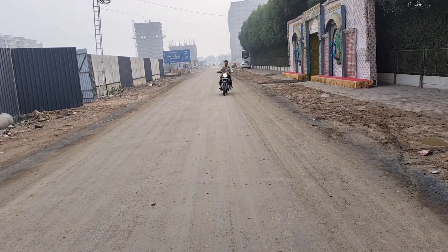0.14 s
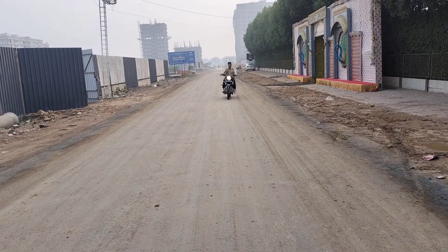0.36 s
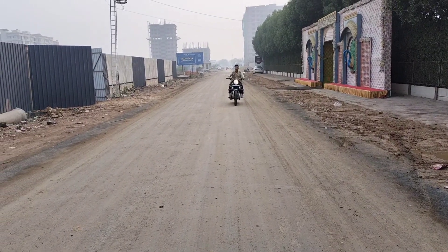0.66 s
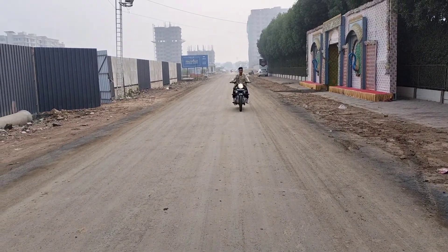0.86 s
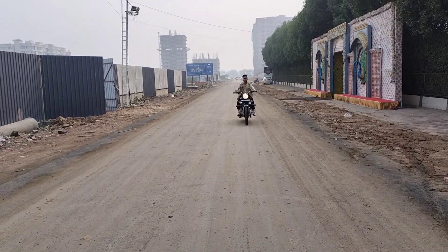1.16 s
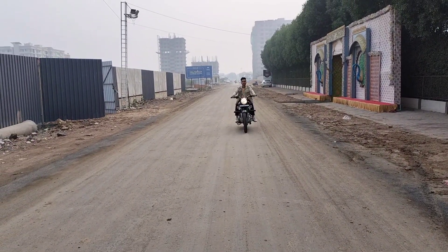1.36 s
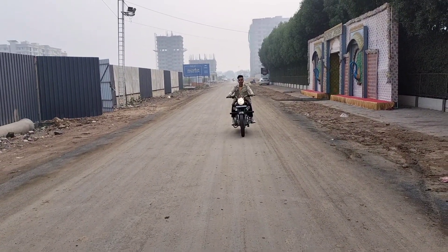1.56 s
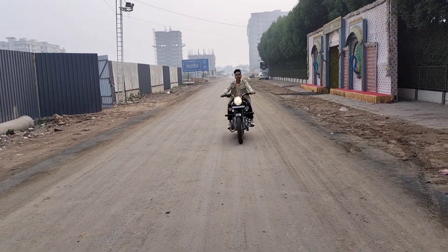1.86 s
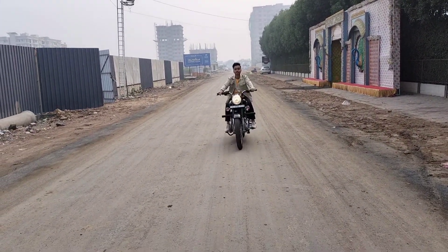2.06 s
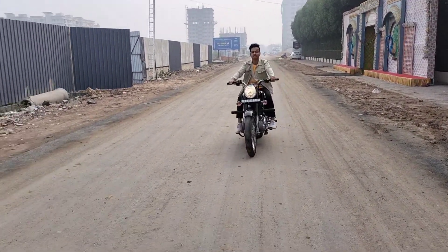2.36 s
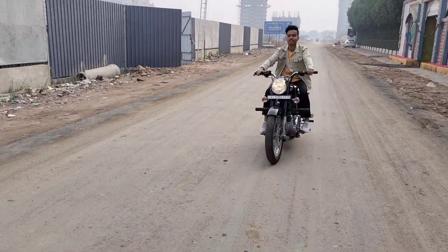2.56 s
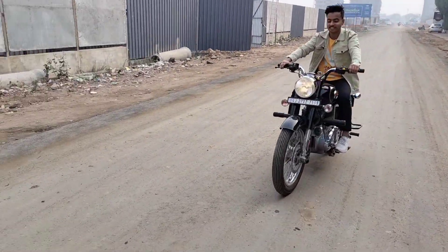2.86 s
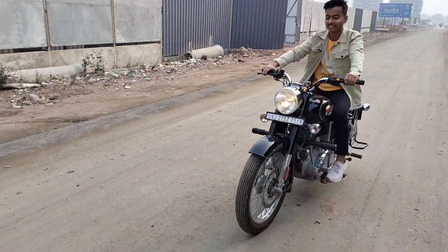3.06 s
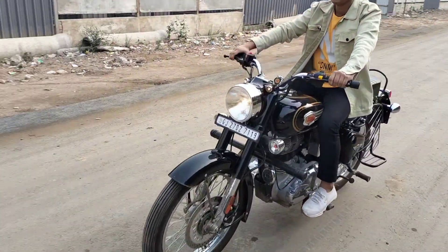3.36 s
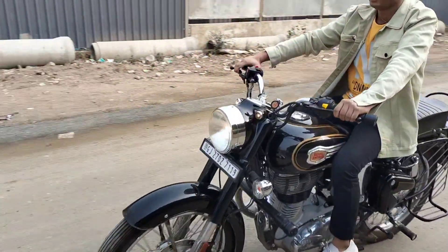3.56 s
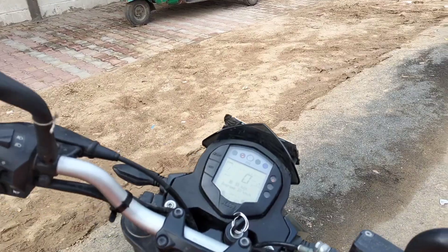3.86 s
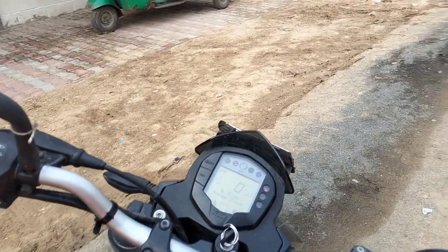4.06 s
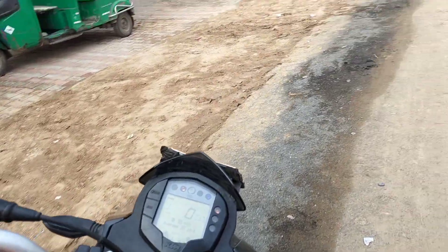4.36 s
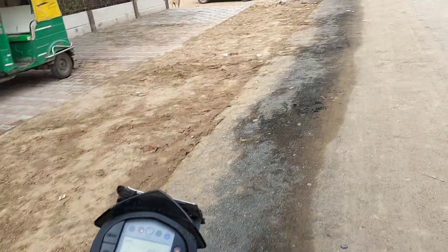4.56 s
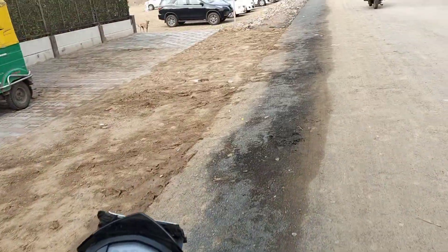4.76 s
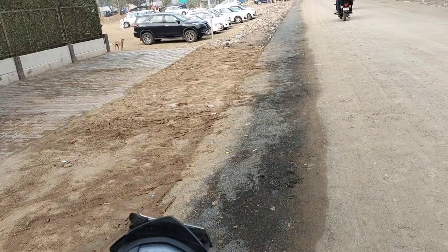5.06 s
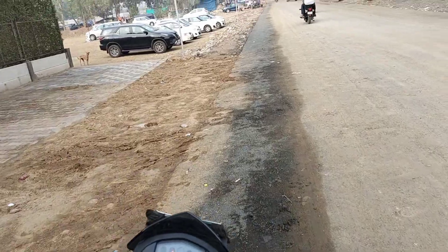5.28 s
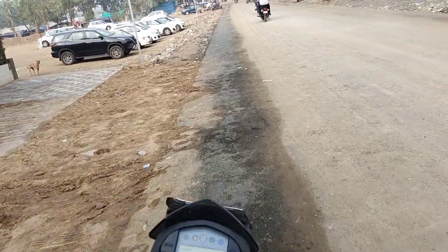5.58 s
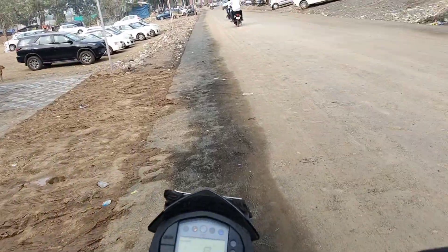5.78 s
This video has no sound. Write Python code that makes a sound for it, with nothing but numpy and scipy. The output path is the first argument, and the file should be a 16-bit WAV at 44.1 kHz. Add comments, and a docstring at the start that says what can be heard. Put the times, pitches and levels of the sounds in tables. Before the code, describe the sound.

Deep motorcycle exhaust roars up a roadside, eases into slow thuds, a brief silent gap, then a raspier small engine accelerates from the saddle.

```python
"""Two single-cylinder motorcycles on a dusty road

From the roadside, a big single rides up: it pulls, coasts for a gear change, pulls again, then slows until every
firing is a separate thump. After a short silence a smaller single pulls away, heard from the saddle, and changes
up once. Pulses timed by the engine cycle ring pipes and mufflers, timed noise bursts make rasp, clatter and valve
ticks, and the running gear clicks and squeaks. Fences and walls answer with decaying noise; filtered noise makes
the road bed behind the first machine and the wind around the second.
"""
import sys
import numpy as np
from scipy import signal
from scipy.fft import rfft, irfft, next_fast_len
from scipy.io import wavfile
from scipy.ndimage import uniform_filter1d, map_coordinates

SR = 44100
rng = np.random.default_rng(int(sys.argv[2]) if len(sys.argv) > 2 else 0)


def wav_record(signal):
    """Record a signal, one row per channel, as 16-bit PCM in the file named by sys.argv[1]."""
    frames = np.transpose(np.atleast_2d(signal))
    bounded = np.clip(frames, -1, 1)
    # unit amplitude maps onto the largest positive 16-bit level
    quanta = np.round(bounded * 32767).astype(np.int16)
    wavfile.write(sys.argv[1], SR, quanta)


N = 261072
TIME = np.arange(N) / SR
SMEAR_S = 0.04  # longest delay of a note in the big exhaust at speed, so the firings run together

# rasp of the small engine in first gear, also the tone of its valve ticks: (frequency [Hz], level [dB])
LAUNCH_RASP = [(650, -11), (1100, -6), (1460, -1.5), (1740, -1.5), (2110, -6), (2490, -1), (3080, -9),
               (3650, -6), (4880, -13.5), (5970, -12), (7810, -20.5), (12900, -23.5), (16000, -28)]


def amp(db):
    """Decibels to gain."""
    return 10 ** (np.asarray(db) / 20)


def unit(x):
    """x at rms 1."""
    return x / np.sqrt(np.mean(x ** 2) + 1e-20)


def along(points, hz):
    """Values at hz from (frequency [Hz], value) points on a log frequency axis."""
    f, v = np.transpose(points)
    return np.interp(np.log(hz + 1), np.log(f + 1), v)


def curve(rows):
    """One value per sample from (time [s], value) rows."""
    times, values = np.transpose(rows)
    return np.interp(TIME, times, values)


def filtered(x, response):
    """x times a complex response of frequency."""
    n = x.shape[-1]
    m = next_fast_len(n + SR // 2, real=True)
    return irfft(rfft(x, m) * response(np.fft.rfftfreq(m, 1 / SR)), m)[..., :n]


def coloured(x, spectrum):
    """x through a (frequency [Hz], level [dB]) spectrum."""
    return filtered(x, lambda hz: amp(along(spectrum, hz)))


def ring(x, modes):
    """x through resonances (frequency [Hz], width [Hz], level [dB]); the packing absorbs the treble."""
    def body(f):
        total = 0
        for k, (centre, width, db) in enumerate(modes):
            resonance = 1j * f * width / (centre * centre - f * f + 1j * f * width)
            total = total + (-1) ** k * amp(db) * resonance  # neighbours have opposite signs
        return total / (1 + (f / 2000) ** 2)
    return filtered(x, body)


def crank(speed):
    """Engine cycles turned since the first firing, which falls on the first row, and the firing rate [Hz]."""
    rate = curve(speed)
    first_s, first_rate = speed[0]
    return np.cumsum(rate) / SR - first_s * first_rate, rate


def steady(x, cycles):
    """x with the same power in every part of the run, judged over a few engine cycles."""
    index = (np.floor(cycles) - np.floor(cycles[0])).astype(int)
    power = np.bincount(index, np.mean(np.atleast_2d(x) ** 2, axis=0)) / np.bincount(index)
    return x / np.sqrt(np.abs(uniform_filter1d(power, size=3))[index] + 1e-20)


def firings(cycles, scatter_db):
    """One pressure pulse per cycle, each of its own size."""
    pulses = np.diff(np.floor(cycles), prepend=np.floor(cycles[0]) - 1)
    return unit(pulses * amp(scatter_db * rng.standard_normal(N)))


def puffs(cycles, rate, beats, bed, alike=0):
    """Stereo noise bursting at beats (cycle share, life [s], level [dB]) over a steady bed.

    The share alike of its power repeats the same noise in every cycle.
    """
    gate = bed
    for at, life, db in beats:
        since = ((cycles - at) % 1) / rate  # seconds since this beat
        gate = gate + amp(db) * np.exp(-since / life)
    age = np.arange(N) - np.searchsorted(cycles, np.floor(cycles))  # samples since the cycle began
    fresh = rng.standard_normal((2, N))
    repeated = fresh[:, -1 - age]
    return unit(gate * (np.sqrt(1 - alike) * fresh + np.sqrt(alike) * repeated))


def flicker(rate, depth_db):
    """A random gain that moves rate times a second."""
    knots = rng.standard_normal(int(N * rate / SR) + 4)
    return amp(depth_db * map_coordinates(knots, [np.arange(N) * rate / SR], order=1))


def narrowed(pair, width):
    """A stereo pair with its side part scaled."""
    mid, side = pair[0] + pair[1], width * (pair[0] - pair[1])
    return np.array([mid + side, mid - side]) / np.sqrt(2 + 2 * width ** 2)


def pipe(x, trip, reflection):
    """The pressure front comes back after every round trip [s] of the pipe."""
    return filtered(x, lambda hz: 1 / (1 - reflection * np.exp(-2j * np.pi * hz * trip)))


def swell(throttle, shut_db, open_db, exponent):
    """Gain of a layer that grows from its shut-throttle to its open-throttle level."""
    return amp(shut_db) + (amp(open_db) - amp(shut_db)) * throttle ** exponent


def retuned(x, tuning, body):
    """x through a body whose resonances all slide by the pitch factor tuning."""
    clock = np.cumsum(tuning)
    even = np.arange(int(clock[-1]) + 1)
    answer = body(np.array([np.interp(even, clock, row) for row in np.atleast_2d(x)]))
    return np.array([np.interp(clock, even, row) for row in answer])


def smeared(x, longest_s):
    """Many paths through a pipe: every note leaves after its own delay, at full strength."""
    knots = np.arange(0, 2000, 25)  # Hz
    delays = longest_s * rng.random(len(knots))
    return filtered(x, lambda hz: np.exp(-2j * np.pi * np.cumsum(np.interp(hz, knots, delays)) * hz[1]))


def ports(x, lead_s):
    """A sound from one side reaches the left microphone port lead_s before the right."""
    return filtered(x, lambda hz: np.exp(1j * np.pi * hz * lead_s * np.array([[1], [-1]])))


def big_single():
    """Each firing rings the long pipe and the muffler; the throttle decides which resonances speak."""
    # engine speed: (time [s], firing rate [Hz])
    big_speed = [(-0.011, 20.52), (0.8, 23.59), (1.2, 20.04), (1.32, 15.38), (1.49, 16.38), (2.26, 17.02),
                 (2.5, 15.97), (2.75, 13.45), (2.95, 12.17)]
    # throttle opening: (time [s], opening [0-1])
    big_throttle = [(0.22, 0.65), (0.5, 0.93), (0.84, 0.94), (0.92, 0.08), (1.02, 0.08), (1.19, 0.11),
                    (1.225, 0.3), (1.8, 0.62), (2.31, 0.55), (2.42, 0.12), (2.6, 0.05)]
    # muffler pitch as its gas heats and cools: (time [s], pitch factor)
    big_tuning = [(0.1, 1.01), (0.45, 1.026), (0.8, 0.98), (1.25, 0.97), (1.7, 1), (2.3, 1.02),
                  (2.55, 0.85)]
    # muffler resonances at speed: (frequency [Hz], width [Hz], level [dB])
    fast_muffler = [(464, 29, -15), (623.3, 21, 2.5), (680, 43, -11.5), (740, 19, -0.5), (898, 25.4, -2.5),
                    (937, 34, -9)]
    # muffler on part throttle, where the gas is cooler: (frequency [Hz], width [Hz], level [dB])
    part_muffler = [(471, 16, -10), (600.4, 20.3, 2.5), (717, 56, -7), (908, 17.2, -2), (1227, 16, -10)]
    # level of the pipe's boom: (time [s], level [dB])
    boom_level = [(0.85, 2.5), (0.95, 2.5), (1.1, 5.5), (1.19, 1), (1.35, 1.5), (2.3, 3.5), (2.5, 6),
                  (2.9, 5.5)]
    # rasp under load: (frequency [Hz], level [dB])
    big_rasp = [(590, -15.5), (1000, -17), (1120, -9.5), (1250, 3), (1480, -5.5), (1980, 3.5), (2200, -4),
                (2560, 0), (2910, -11.5), (3670, -9.5), (4790, -20.5), (5630, -17), (7880, -34),
                (13300, -32.5), (16000, -38)]
    # clatter off load: (frequency [Hz], level [dB])
    big_clatter = [(530, -35.5), (860, 1), (979, 0), (1100, -9.5), (1620, -5), (1750, -7), (2420, -1),
                   (3000, -8.5), (3770, -9.5), (5350, -18.5), (7860, -26.5), (15100, -31), (16000, -43)]
    # ticks of the valves: (frequency [Hz], level [dB])
    big_valves = [(1500, -24), (3000, -2), (3800, 4.5), (5600, -1.5), (7500, -13.5), (9000, -22),
                  (16000, -24)]
    thumps_from_s = 2.981  # the running exhaust gives way to the separate thumps here

    cycles, rate = crank(big_speed)
    throttle = curve(big_throttle)
    load = np.clip(throttle * 2, 0, 1)
    flat_out = np.clip((throttle - .6) / .4, 0, 1)
    pulse = firings(cycles - .06, scatter_db=1.8)
    gas = puffs(cycles, rate, [(0.017, 0.042, 0.0063)], bed=1.0)
    rush = .38 * narrowed(gas, width=.4)

    # the muffler barks: hot and smeared at speed, cooler and more distinct on part throttle
    hot = np.clip((rate - 20) / .5, 0, 1) * np.clip((1.15 - TIME) / .2, 0, 1)
    full = retuned(smeared(pulse, SMEAR_S) + rush, big_tuning_curve := curve(big_tuning),
                   lambda x: ring(x, fast_muffler))
    distinct = unit(pipe(pulse, trip=.0075, reflection=-.45))
    lingering = .9 * smeared(pulse, SMEAR_S)  # rings on from beat to beat
    part = retuned(distinct + lingering + rush, big_tuning_curve, lambda x: ring(x, part_muffler))
    bark = ports(steady(hot * full + (1 - hot) * part, cycles), lead_s=0.00012)

    boom = amp(curve(boom_level)) * big_boom(cycles, rate, gas, load, flat_out)
    boom = swell(throttle, shut_db=-22.5, open_db=-17, exponent=1.5) * boom
    bark = swell(throttle, shut_db=-47.5, open_db=-18, exponent=1.0) * bark
    rolling = np.clip((thumps_from_s + .01 - TIME) / .02, 0, 1)
    exhaust = rolling * (boom + bark)

    rasp_beats = [(0, .008, -9), (.17, .005, -2), (.4, .006, -9), (.65, .008, -9)]
    rasp = flicker(300, depth_db=2.5) * puffs(cycles, rate, rasp_beats, bed=.42, alike=.65)
    rasp = steady(coloured(narrowed(rasp, width=0.98), big_rasp), cycles)
    clatter_beats = [(.05, 0.0019, -5), (.55, 0.0017, -2.5)]
    clatter = flicker(250, depth_db=2.5) * puffs(cycles, rate, clatter_beats, bed=1.0)
    clatter = steady(coloured(narrowed(clatter, width=1.0), big_clatter), cycles)
    clatter = clatter * amp(4 * np.clip(TIME - thumps_from_s, 0, 1))  # grows 4 dB/s over the last metres
    hiss = np.sqrt(load) * rasp + np.sqrt(1 - load) * clatter
    hiss = swell(throttle, shut_db=-37, open_db=-21, exponent=3.97) * hiss

    valves = unit(coloured(puffs(cycles, rate, [(.905, .002, 0), (.41, .0015, -3)], bed=0), big_valves))
    return exhaust + hiss + amp(-45) * load * valves


def big_boom(cycles, rate, gas, load, flat_out):
    """The long pipe: sharp beats at low speed, a continuous roar at high speed, a sinking throb when coasting."""
    # beat of the pipe on part throttle: (frequency [Hz], level [dB])
    beat_tone = [(25, -26.5), (45, -15), (70, 4.5), (130, 1), (175, -12), (230, 3), (305, -5), (360, -19.5),
                 (480, -23.5), (800, -61)]
    # what the pipe rings with after each beat: (frequency [Hz], width [Hz], level [dB])
    pipe_ring = [(134, 14, 0), (227, 30, -7.5), (309, 9.4, -4)]
    # roar of the pipe at speed: (frequency [Hz], level [dB])
    roar_tone = [(45, -16), (68, -5), (90, -0.5), (135, -3), (170, -9), (215, -5.5), (250, -6), (300, -1),
                 (345, -15.5), (480, -26), (800, -62.5)]
    # soft throb with the throttle shut: (frequency [Hz], level [dB])
    coasting_tone = [(25, -31), (45, -3), (65, 8), (125, -2.5), (170, -6.5), (250, -21), (450, -29),
                     (800, -76.5)]

    rush = .4 * narrowed(gas, width=.4)
    pulse = firings(cycles - .03, scatter_db=1.3)
    # the intake gulps, which differ in size, work against the exhaust pulses
    gulp = coloured(firings(cycles + .09, scatter_db=5.5), [(100, 0), (300, -7)])
    lingering = .6 * smeared(pulse, SMEAR_S)  # stays in the pipe and fills the gaps
    beats = pipe(pulse, trip=.0147, reflection=0.47) - gulp + lingering + rush
    beats = unit(coloured(beats, beat_tone))
    beats = steady(beats + amp(-6) * unit(ring(pulse + rush, pipe_ring)), cycles)

    # at speed the sixth order meets the pipe resonance and builds a standing wave
    standing = flicker(14, depth_db=1) * np.sqrt(2) * np.sin(2 * np.pi * 6 * cycles)
    roar = steady(coloured(smeared(pulse, SMEAR_S) + rush, roar_tone), cycles)
    roar = roar + (0.67 + flat_out) * standing
    fast = np.clip((rate - 18) / 2, 0, 1)
    pulling = steady((1 - fast) * beats + fast * roar, cycles)

    soft = firings(cycles + .04, scatter_db=1.2) + rush
    soft = (1 - fast) * soft + fast * smeared(soft, SMEAR_S)
    cooling = (rate / 15) ** .7  # pitch sinks with speed; the round trip below holds at 15 firings a second
    coasting = retuned(soft, cooling,
                       lambda x: coloured(pipe(x, trip=.0172, reflection=0.52), coasting_tone))
    return steady(load * pulling - (1 - load) * steady(coasting, cycles), cycles)


def walls(x):
    """Scattered answers from fences and walls: decaying noise, different at each port and weak in the bass."""
    # decay of the answers: (frequency [Hz], time to fall by 60 dB [s])
    wall_decay = [(100, 1), (1000, 0.63), (10000, 0.31)]
    hz, t, z = signal.stft(rng.standard_normal((2, SR // 3)), SR, nperseg=256)
    decay = amp(-60 * t / along(wall_decay, hz)[:, None])
    tail = signal.istft(z * decay, SR, nperseg=256)[1]
    wet = signal.fftconvolve(x, tail / np.linalg.norm(tail[0]), axes=1)[:, :N]
    return coloured(wet, [(120, -28.0), (300, -1), (700, 8)])


def road():
    """Tyre roar and far traffic: steady low noise."""
    # (frequency [Hz], level [dB])
    road_tone = [(25, -30.5), (60, -27.5), (130, -0.5), (300, -8.5), (600, -8.5), (1000, -19.5),
                 (2000, -35), (4000, -53.5)]
    return amp(-33) * unit(coloured(narrowed(rng.standard_normal((2, N)), width=.4), road_tone))


def running_gear():
    """Metal clicks are noise bursts through a resonance; faint squeaks and whines are narrow swells of noise."""
    # metal clicks: (time [s], peak level [dB], pitch [Hz])
    clicks = [(3.036, -9.5, 2250), (3.542, -14, 1950), (3.754, -19, 3900), (3.861, -5, 3100),
              (3.862, -15, 7000)]
    # squeaks and whines: (time [s], level [dB], pitch [Hz], half width [Hz], half length [s])
    squeaks = [(1.187, -52, 5230, 220, 0.041), (2.473, -51.5, 8060, 220, .033),
               (2.858, -32.5, 443, 15, 0.027), (3.682, -33.5, 963, 23, 0.15)]
    out, t = np.zeros((2, N)), np.arange(SR // 20) / SR
    for s, db, hz in clicks:
        b, a = signal.iirpeak(hz, 3.6, SR)
        burst = rng.standard_normal((2, len(t))) * np.exp(-t / 0.0018)
        click = signal.lfilter(b, a, signal.lfilter(b, a, burst))
        out[:, round(s * SR):][:, :len(t)] += amp(db) * click / np.abs(click).max()
    for s, db, hz, width, length in squeaks:
        tone = unit(filtered(rng.standard_normal((2, N)), lambda f: np.exp(-((f - hz) / width) ** 2)))
        out += amp(db) * tone * np.exp(-((TIME - s) / length) ** 2)
    return out


def thumps():
    """At walking pace each firing rings the pipe, bending upward as hot gas fills it, and chuffs in the muffler."""
    # slow firings under load: (time [s], boom [dB], chuff of gas [dB], muffler ring [dB])
    slow_firings = [(2.982, -7, -21.5, -30), (3.066, -6, -24.5, -24.5), (3.154, -6, -24.5, -44),
                    (3.245, -7, -25.5, -29), (3.339, -6, -25, -32), (3.439, -5.5, -29, -39.5),
                    (3.542, -4.5, -28.5, -46.5), (3.646, -5.5, -36, -49), (3.754, -3.5, -36.5, -50),
                    (3.862, -3.5, -31, -39.5)]
    # pipe modes, before scatter: (frequency [Hz], width [Hz], level [dB], share by which the ring starts flat)
    lugging = [(69.1, 7.4, -4.5, 0.038), (98.5, 22, 4.5, 0.15), (125.1, 6.5, 0, 0.17),
               (190.6, 12, -9, 0.24), (306.6, 10.5, -7, .42), (463, 14, -20, 0.091), (930, 14, -29, .2)]
    # chuff of gas: (frequency [Hz], level [dB])
    chuff_tone = [(120, -15.5), (250, 9), (340, -13.5), (460, -11), (570, -0.5), (680, 2.5), (740, -5),
                  (860, 2), (1000, -25.5), (1400, -47.5)]
    ring_peak_s = 0.03  # the muffler ring takes this long to swell

    out, t = np.zeros((2, N)), np.arange(SR // 4) / SR
    rush = unit(coloured(narrowed(rng.standard_normal((2, N)), width=0.21), chuff_tone))
    for s, boom_db, chuff_db, ring_db in slow_firings:
        span = slice(round(s * SR), round(s * SR) + len(t))
        settle = 0.025 * np.exp(rng.normal(0, .3))  # seconds for the pitch to settle, scattered
        lag = settle * (1 - np.exp(-t / settle))
        # turbulence shakes the rings
        shake = 0.5 * np.interp(t, t[::200], rng.standard_normal(len(t[::200])))
        boom = 0
        for hz, width, level, bend in lugging:
            gain = amp(level + rng.normal(0, 1.5)) * np.exp(-np.pi * width * t)
            phase = 2 * np.pi * hz * rng.normal(1, .014) * (t - bend * lag) + shake * hz / 200
            boom = boom + gain * np.sin(phase)
        boom = amp(boom_db) * (1 - np.exp(-t / 0.004)) * boom
        chuff = amp(chuff_db) * rush[:, span] * np.exp(-t / 0.031)
        swelling = t / ring_peak_s * np.exp(1 - t / ring_peak_s)
        note = amp(ring_db) * swelling * np.sin(2 * np.pi * 566 * rng.normal(1, .01) * t)
        out[:, span] += chuff + note - boom
    return filtered(out, lambda hz: (1j * hz / (22 + 1j * hz)) ** 2)  # low cut at 22 Hz


def small_single():
    """Sharp pulses and their echoes in a short exhaust, with the engine rasping close by."""
    # engine speed: (time [s], firing rate [Hz])
    small_speed = [(4.44, 28.21), (4.78, 32.53), (4.87, 30.28), (4.98, 31.52), (5.08, 29.2), (5.16, 24.13),
                   (5.22, 22.59), (5.92, 26.4)]
    # throttle opening: (time [s], opening [0-1])
    small_throttle = [(4.52, 0.9), (4.85, 0.79), (4.89, 0.43), (5.08, 0.55), (5.14, 0.14), (5.208, 0.03),
                      (5.214, 0.8), (5.35, 0.9)]
    # muffler pitch as its gas heats and cools: (time [s], pitch factor)
    small_tuning = [(4.5, 0.99), (4.8, 0.99), (5.22, 0.99), (5.36, 1.025), (5.6, 0.995), (5.92, 1.065)]
    # exhaust resonances under load: (frequency [Hz], width [Hz], level [dB])
    small_pulling = [(122, 64, 2.5), (257, 91, 3), (443, 82, -7.5)]
    # muffler resonances in first gear: (frequency [Hz], width [Hz], level [dB])
    launch_muffler = [(519, 290, -19.5), (673, 45, 0.5), (824, 85, -6.5)]
    # muffler resonances in second gear: (frequency [Hz], width [Hz], level [dB])
    cruise_muffler = [(469, 93, -13.5), (646.4, 21, 1.5), (764, 34, -7), (918, 49, -8.5)]
    # rasp in second gear: (frequency [Hz], level [dB])
    small_rasp = [(650, -26.5), (1100, -5), (1260, -4.5), (1460, 5), (1570, -0.5), (2640, -1.5), (2950, -6),
                  (3570, -7), (3900, -14), (4360, -9), (11800, -21.5), (13100, -19.5), (16000, -25.5)]
    # crack of each firing: (frequency [Hz], level [dB])
    crack_tone = [(600, -22), (1100, -2), (1450, 11.5), (2400, -6), (3100, -12.5), (6000, -30),
                  (16000, -40)]
    shift_from_s, shift_to_s = 4.882, 5.207

    cycles, rate = crank(small_speed)
    throttle = curve(small_throttle)
    second_gear = np.clip((TIME - 5.1) / .1, 0, 1)
    first_gear = 1 - second_gear
    shifting = np.clip(np.minimum(TIME - shift_from_s, shift_to_s - TIME) / .01 + .5, 0, 1)
    driving = 1 - shifting

    pulse = firings(cycles + .03, scatter_db=.8)
    gas = puffs(cycles, rate, [(0.02, 0.009, 0)], bed=0.97)
    uneven = .002 * np.log(flicker(30, depth_db=8))  # the gulps wander in time, in cycles
    intake = firings(cycles - .67 + uneven, scatter_db=2)
    early_intake = amp(-4) * firings(cycles - .55, scatter_db=2.0)
    launch = pipe(pulse + early_intake, trip=.0127, reflection=.35)
    cruise = pipe(pulse + intake, trip=.0137, reflection=.15)
    returns = steady(first_gear * launch + second_gear * cruise, cycles)
    drive = returns + (.22 + .14 * second_gear) * narrowed(gas, width=.6)

    boom = steady(ring(narrowed(drive, width=0.47), small_pulling), cycles)
    # in second gear the sixth order locks onto the pipe resonance and sounds on between firings
    standing = flicker(16, depth_db=2) * np.sqrt(2) * np.sin(2 * np.pi * 6 * cycles)
    boom = steady(boom - .85 * second_gear * standing, cycles)
    boom = driving * amp(-5 * first_gear) * boom  # 5 dB softer in first gear

    # with the clutch in only the rush of gas is left in the muffler
    drive = driving * drive + shifting * gas
    # in second gear the muffler is struck again a third of a cycle later
    drive = drive + .7 * second_gear * firings(cycles - .35, scatter_db=3)
    tuning = curve(small_tuning)
    launch_bark = retuned(drive, tuning, lambda x: ring(x, launch_muffler))
    cruise_bark = retuned(drive, tuning, lambda x: ring(x, cruise_muffler))
    bark = steady(first_gear * launch_bark + second_gear * cruise_bark, cycles)

    blast_beats = [(0, .003, 0), (.34, .003, 2.5), (.5, .003, -5), (.67, .003, -2), (.86, .003, -7)]
    blast = puffs(cycles, rate, blast_beats, bed=.33, alike=.5)
    rasp = flicker(60, depth_db=2) * (driving * blast + shifting * rng.standard_normal((2, N)))
    rasp = first_gear * coloured(rasp, LAUNCH_RASP) + second_gear * coloured(rasp, small_rasp)
    rasp = steady(rasp, cycles)
    crack = unit(coloured(puffs(cycles, rate, [(0, .003, 0)], bed=0, alike=.7), crack_tone))
    crack = amp(-34) * throttle * driving * crack
    # the engine case rings as the clutch bites
    case = unit(filtered(blast, lambda hz: np.exp(-((hz - 3630) / 314) ** 2)))
    case = amp(-34.5) * np.exp(-((TIME - 4.53) / 0.12) ** 2) * case

    boom = swell(throttle, shut_db=-25, open_db=-14, exponent=0.59) * boom
    bark = swell(throttle, shut_db=-32.5, open_db=-15.5, exponent=3.63) * ports(bark, lead_s=-0.00021)
    rasp = swell(throttle, shut_db=-55, open_db=-21.5, exponent=0.94) * rasp
    return boom + bark + rasp + crack + case + shifting * gear_change(cycles, rate, gas)


def wind():
    """Air buffets the microphone as low noise, with one gust as the rider moves off."""
    rumble_tone = [(12, -29.5), (35, -19.5), (70, -6.5), (200, -10.0), (800, -66)]  # (Hz, dB)
    rumble = coloured(rng.standard_normal((2, N)), rumble_tone)
    gust = np.exp(-((TIME - 4.55) / 0.087) ** 2)
    return (amp(-22.5) + amp(-25.5) * gust) * unit(narrowed(rumble, width=0.26))


def gear_change(cycles, rate, gas):
    """With the clutch in the pipe throbs softly, its notes sink with the revs and the valves tick through."""
    # soft throb with the throttle shut: (frequency [Hz], level [dB])
    small_coasting = [(30, -28), (70, -7.5), (120, 3), (170, -2.5), (260, -15), (450, -24), (900, -66)]
    # level of the throb: (time [s], level [dB])
    shift_level = [(4.89, -19), (4.94, -13.5), (5.0, -14.5), (5.07, -20.5), (5.1, -23), (5.14, -17.5),
                   (5.2, -17.5)]
    # muffler resonances at the reference speed: (frequency [Hz], width [Hz], level [dB])
    shift_muffler = [(260, 15, -1), (306, 6.2, 0), (414, 7.5, -2.5), (527, 17, -6), (670, 26.9, -6)]
    revs = rate / 34  # relative to 34 firings a second

    soft = firings(cycles - .12, scatter_db=1) + .2 * gas[0]
    throb = steady(coloured(pipe(soft, trip=.009, reflection=0.58), small_coasting), cycles)
    notes = steady(retuned(soft + .5 * gas[1], revs, lambda x: ring(x, shift_muffler)), cycles)
    ticks = puffs(cycles, rate, [(.31, .0015, -2), (.53, 0.0014, 0)], bed=0)
    ticks = amp(-27) * revs ** 4 * unit(coloured(ticks, LAUNCH_RASP))
    return amp(-23.5) * notes - amp(curve(shift_level)) * throb + ticks


def scene():
    """The approach, drier over the last metres; a silent gap; then the ride."""
    approach_end_s, ride_start_s = 3.880, 4.4375
    far, near, small = big_single(), thumps() + running_gear(), small_single()
    approach = far + near + walls(amp(-10) * far + amp(-19) * near) + road()
    ride = small + amp(-14.5) * walls(small) + wind()
    return approach * (TIME < approach_end_s) + ride * (TIME > ride_start_s)


def record(dry):
    """The recorder rounds off the highest peaks and keeps nothing above 16 kHz."""
    rounded = dry / (1 + np.abs(dry / .95) ** 6) ** (1 / 6)
    return filtered(rounded, lambda hz: hz < 16000)


dry = scene()
out = record(dry)
wav_record(out)
```